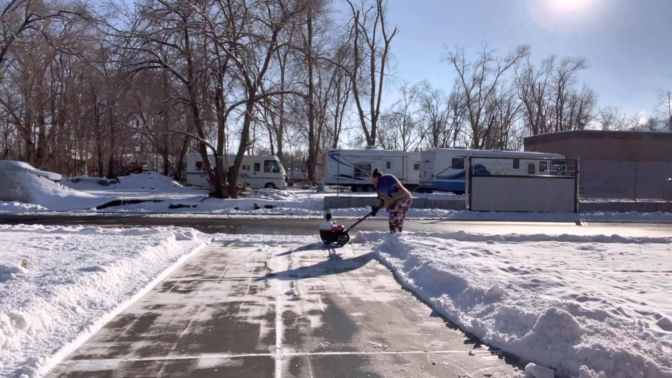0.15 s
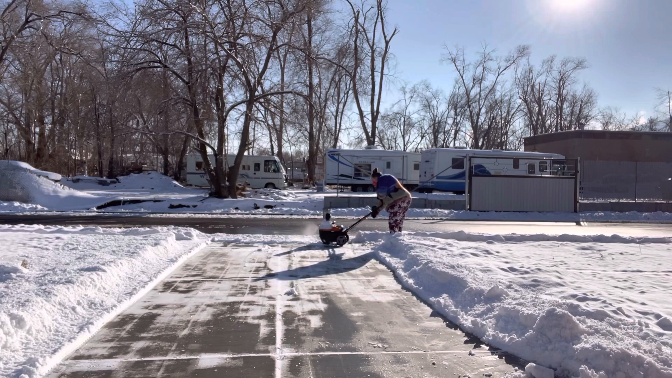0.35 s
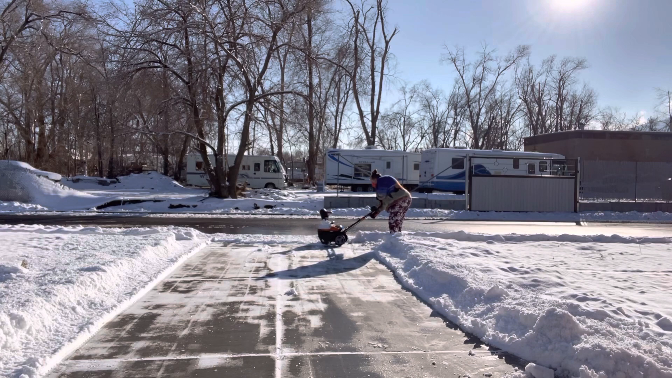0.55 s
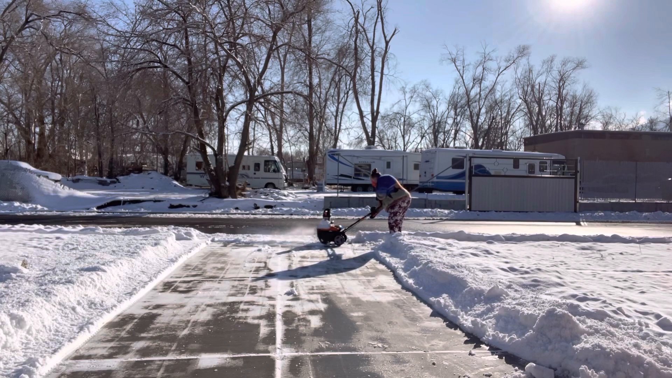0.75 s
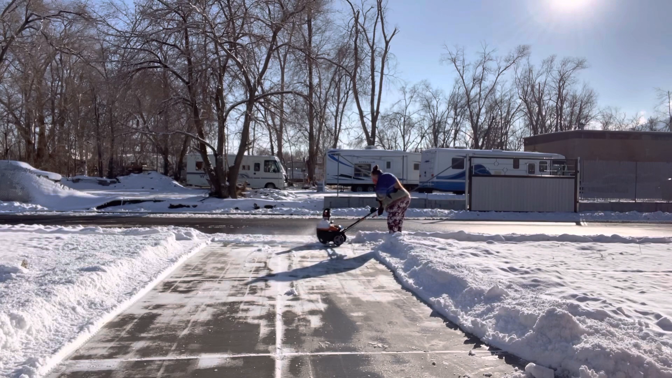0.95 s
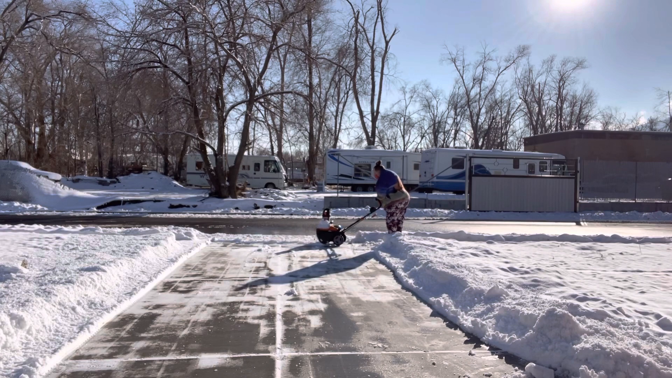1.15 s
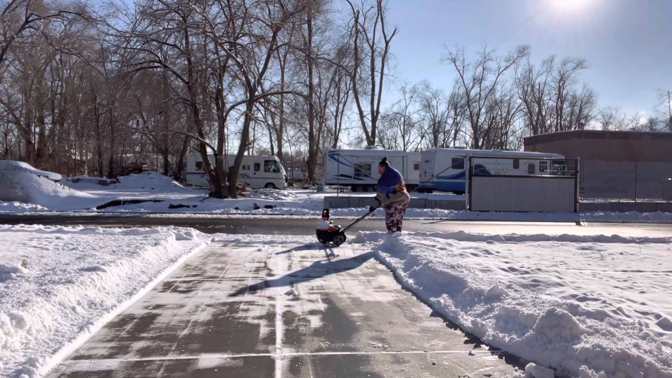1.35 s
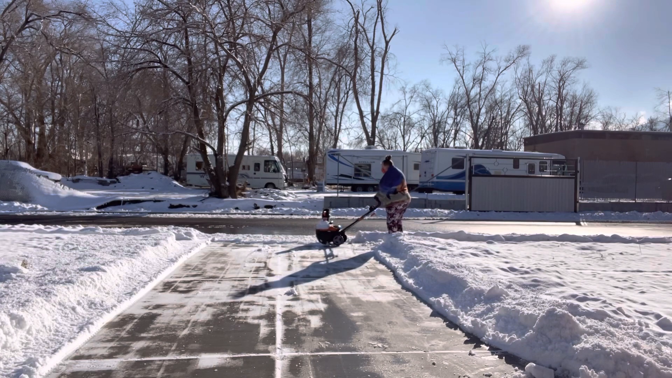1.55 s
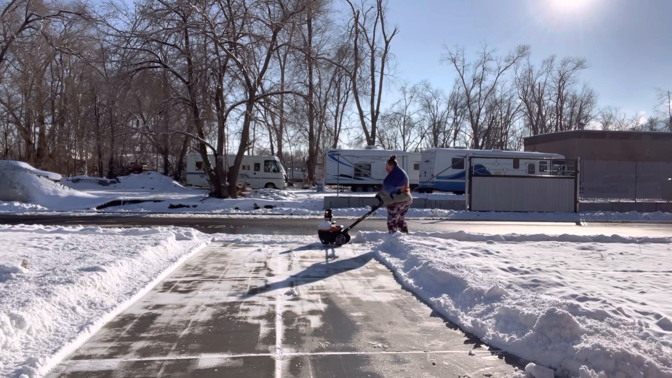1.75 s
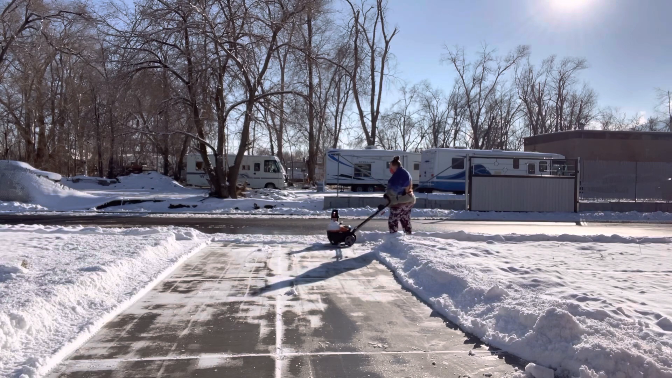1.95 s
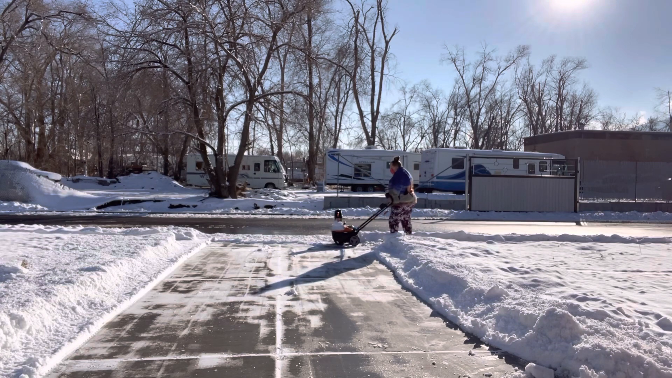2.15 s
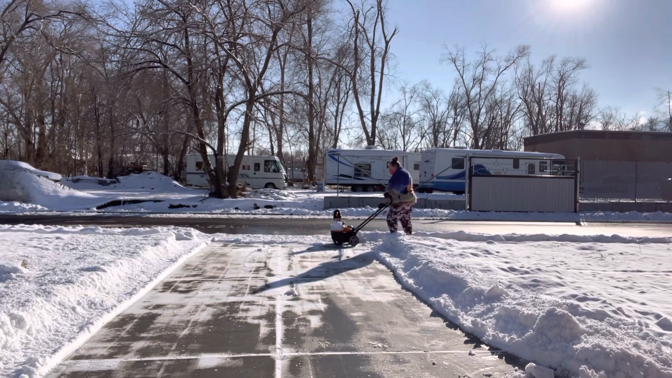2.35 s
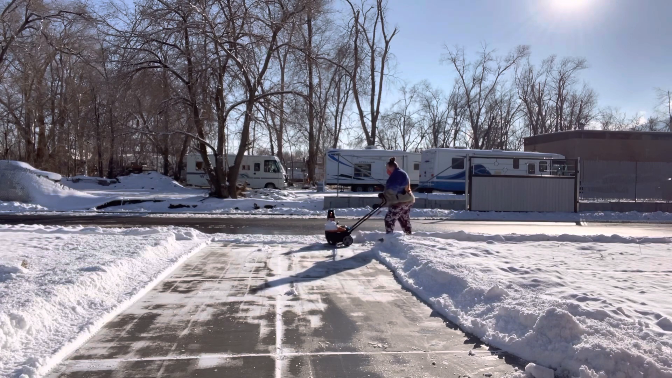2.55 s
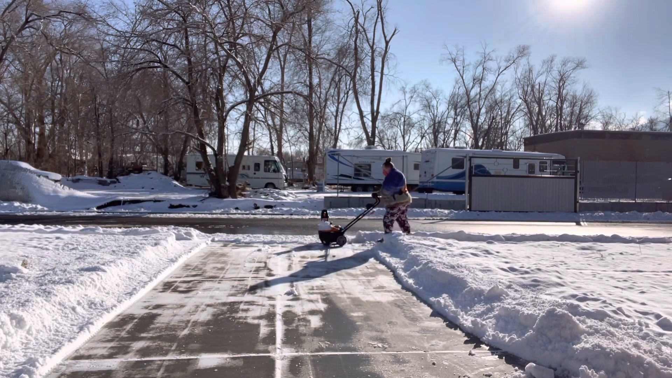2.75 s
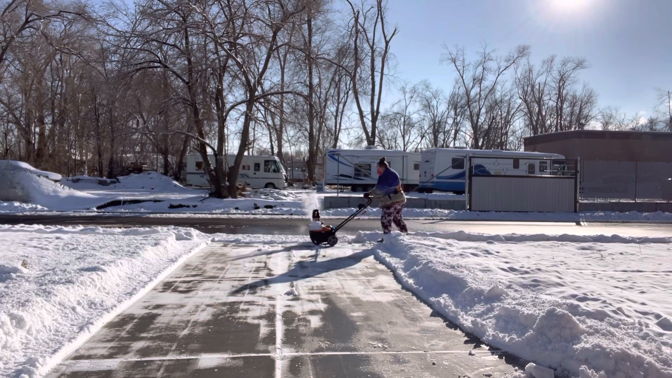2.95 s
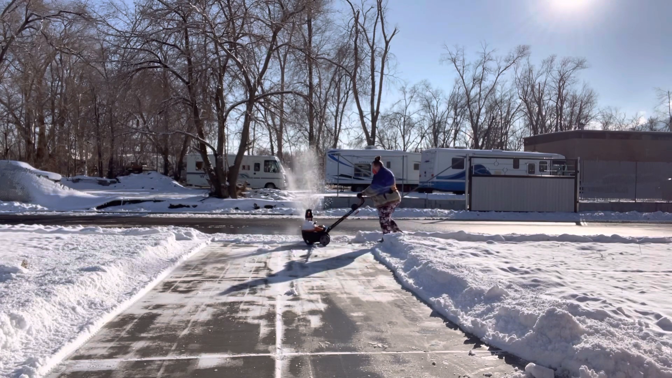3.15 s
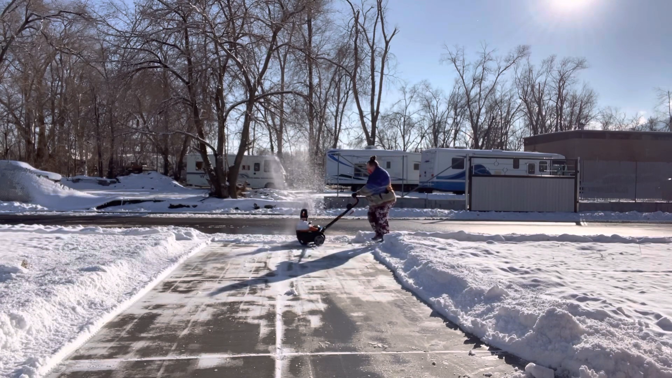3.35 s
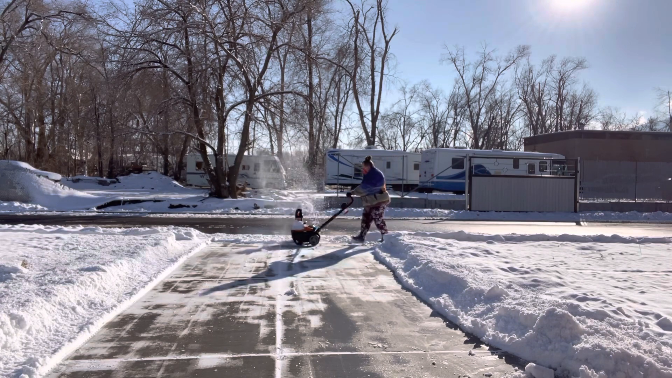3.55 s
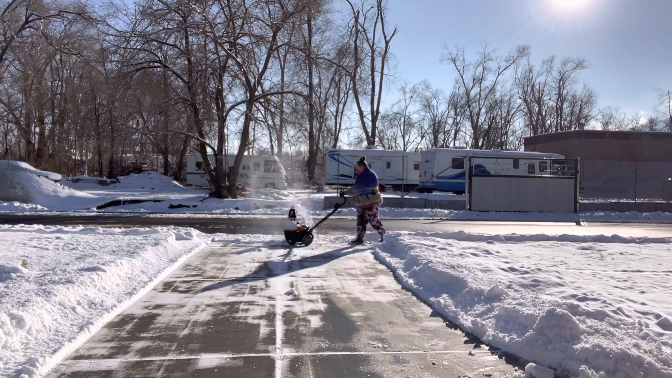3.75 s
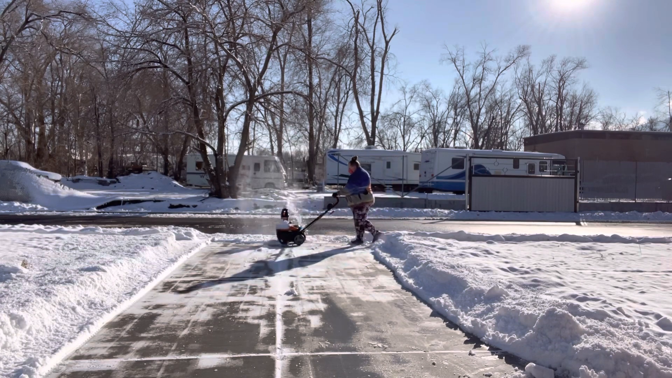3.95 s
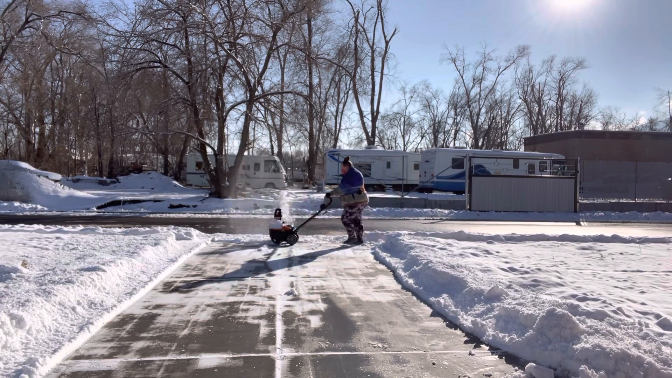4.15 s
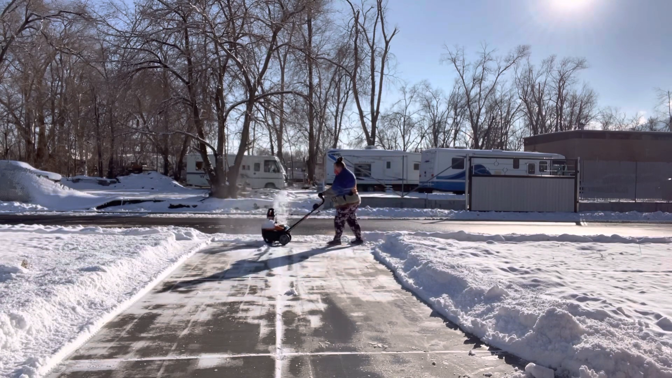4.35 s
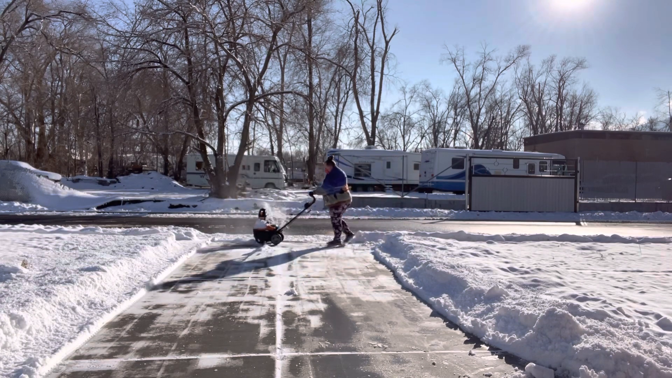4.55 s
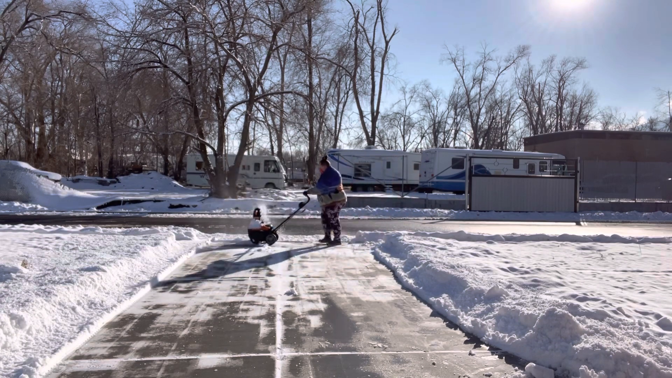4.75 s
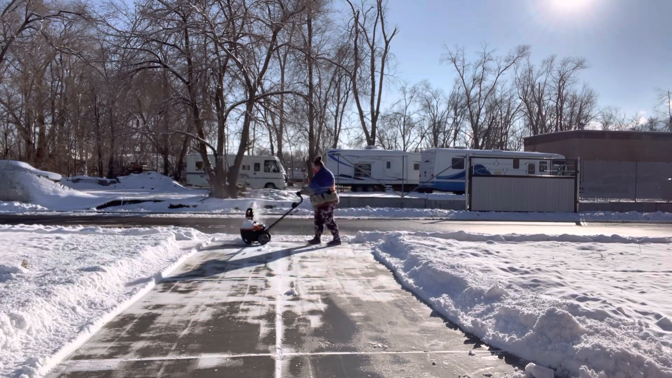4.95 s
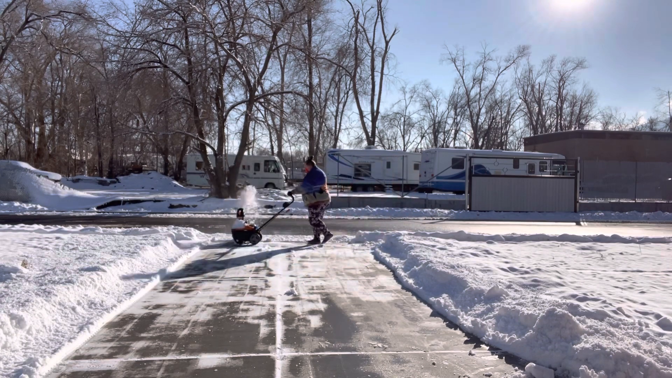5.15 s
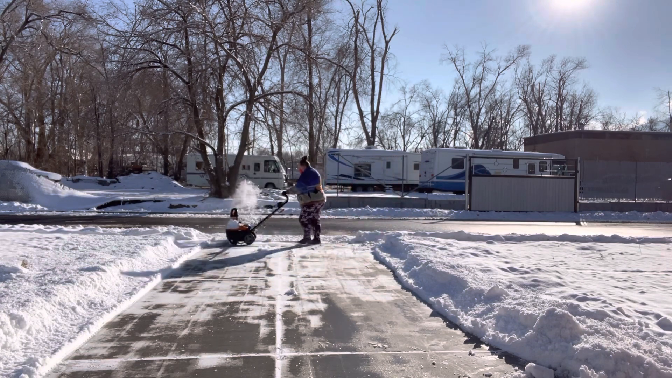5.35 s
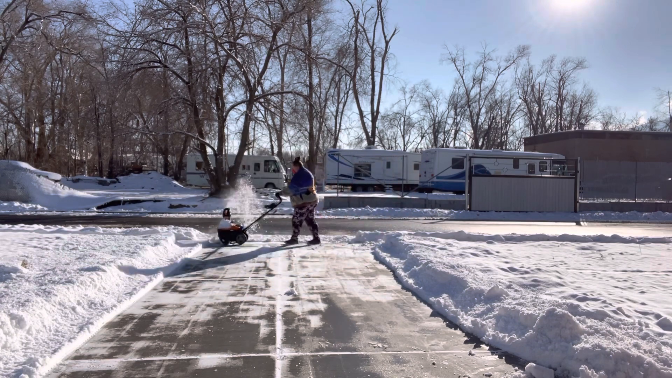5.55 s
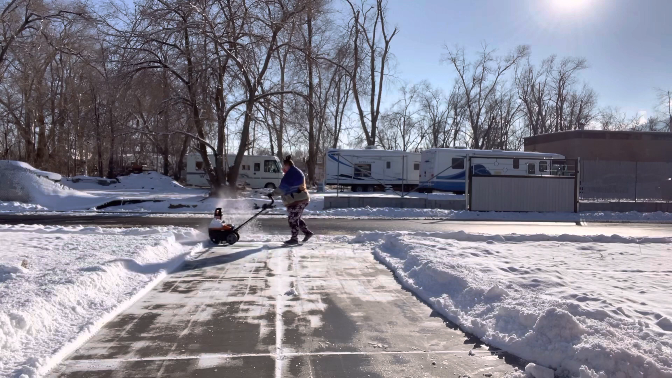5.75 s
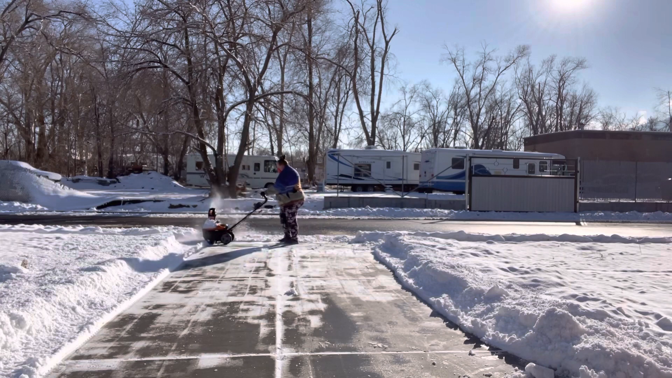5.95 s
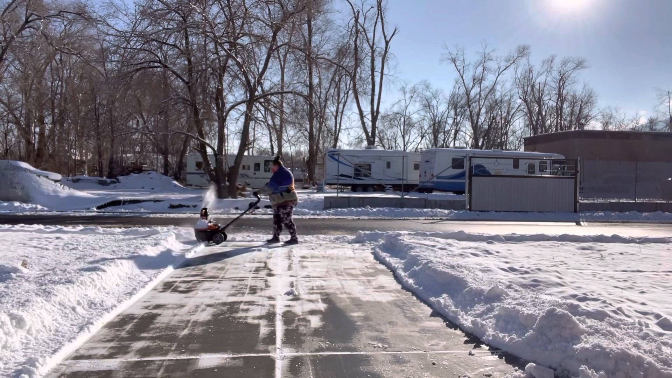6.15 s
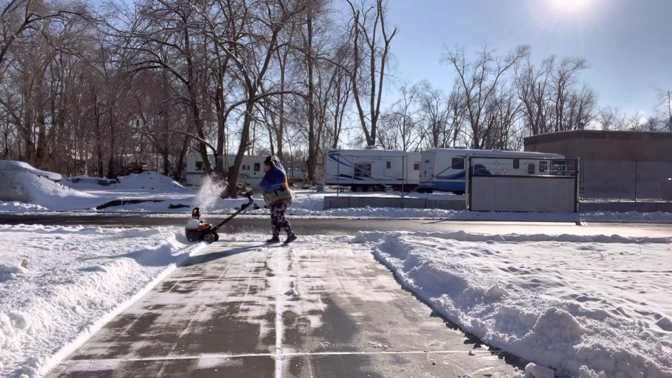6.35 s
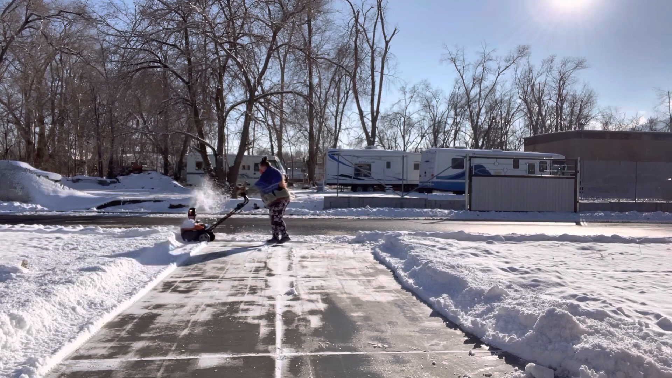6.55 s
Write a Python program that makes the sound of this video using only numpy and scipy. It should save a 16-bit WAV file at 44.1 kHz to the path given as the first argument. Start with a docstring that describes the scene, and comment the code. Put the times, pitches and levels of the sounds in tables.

```python
"""Cordless snowblower on a driveway

A snowblower is pushed across a driveway, some way off, drifting from right to left.
Its electric motor whines (sine tones) and drives a paddle auger by a belt. The housing scrapes the concrete
(filtered clicks) and the auger spins free, then bites into snow: the motor sags, every paddle slaps and
crunches (filtered pulses and grains), and lumps of ice knock in the plastic housing (short dying tones).
Around it are rushing air (filtered noise), echoes from the yard and a distant rumble."""
import sys
import numpy as np
from scipy import signal
from scipy.fft import rfft, irfft, next_fast_len
from scipy.io import wavfile
from scipy.ndimage import uniform_filter1d, map_coordinates

SR = 44100
rng = np.random.default_rng(int(sys.argv[2]) if len(sys.argv) > 2 else 0)


def to_wav(sig):
    """Store sig (one row per channel, or 1-D mono) as 16-bit WAV at the path in sys.argv[1].

    Samples outside -1..1 are clipped; the rate is SR.
    """
    pcm = np.clip(np.atleast_2d(sig), -1, 1) * 32767
    pcm = np.round(pcm).astype(np.int16)
    wavfile.write(sys.argv[1], SR, pcm.T)  # frames by channels


N = 291501
T = np.arange(N) / SR  # time of every sample, in seconds

# Colour of the distant rumble: (pitch [Hz], relative level [dB])
TOWN_COLOUR = [(15, -33), (35, -17), (65, 4.5), (100, -1), (170, 2.5), (400, -8.5), (2000, -27),
               (15000, -99)]
# Colour of the echoes in the yard: (pitch [Hz], relative level [dB])
YARD_COLOUR = [(50, -24), (200, -18), (380, -14), (700, -10.5), (1300, -7.5), (2500, -69), (6000, 6.5),
               (14000, -7)]

# Steady rush of the auger and the cooling air: (pitch [Hz], relative level [dB])
RUSH_COLOUR = [(100, -12), (180, 0), (500, 1.5), (650, -2), (800, 2), (1000, -4.5), (1200, -3.5),
               (1400, -7), (1800, -9), (2250, -11.5), (2600, -17), (3000, -20.5), (3900, -18.5),
               (4600, -20), (5200, -17), (6500, -19), (7400, -58), (8800, -31.5), (12000, -32.5),
               (14500, -36.5)]
# How loud the rush is: (time [s], body level [dB], treble level [dB])
RUSH_LEVEL = [(0, -31.5, -38), (.2, -35.5, -38.5), (.8, -36, -37.5), (1.3, -40.5, -39.5),
              (2.7, -37.5, -37.5), (3.2, -31, -39.5), (5.0, -36, -39.5), (5.6, -36.5, -35),
              (5.8, -38, -36.5), (6.2, -41, -38), (6.6, -45, -44)]
# Fine hiss from the motor vents: (pitch [Hz], relative level [dB])
VENT_COLOUR = [(6500, -40), (7800, -20), (8700, -6), (10800, -4), (12000, 0), (13000, -3), (14200, -20)]
# Air beaten by the paddles: (multiple of the paddle rate [count], relative level [dB])
PADDLE_AIR = [(1, -11.5), (2, -9), (3, 0.5), (4, 1), (5, -6.5), (6, -9), (7, -6.5), (8, -12), (9, -44),
              (10, -7.5), (11, -26), (12, -53)]
# How loud the beaten air is: (time [s], level [dB])
PADDLE_AIR_LEVEL = [(0, -36), (1.1, -43.5), (2.1, -36), (3.2, -35), (4.7, -31), (5.4, -35), (6.1, -54)]

# Colour of the scrape over concrete: (pitch [Hz], relative level [dB])
SCRAPE_COLOUR = [(60, -34), (110, -13), (150, 6), (210, -13), (320, 8), (430, 6.5), (830, 7), (1050, -3.5),
                 (1400, -9.5), (1850, -6.5), (2500, -25), (2950, -33), (3400, -24), (4300, -25),
                 (6500, -23), (8000, -105), (14000, -63)]
# Ringing of the scraper blade: (pitch [Hz], width [Hz], relative level [dB])
BLADE_MODES = [(830, 78, 3), (1750, 83, -9), (2720, 140, -19), (3300, 160, -9)]
# The housing dragged over concrete: (start [s], length [s], level [dB], swell [dB per s])
DRAGS = [(0.0, 0.084, -32, 50), (.255, 0.07, -36, 7), (.41, 0.19, -31, 31.5), (.605, 0.11, -28.5, -18),
         (.925, 0.021, -33, -2)]
DRAG_ATTACK_S, DRAG_RELEASE_S = .02, .025
# The paddles catch the pavement: (start [s], length [s], level [dB], swell [dB per s])
PAVEMENT_CATCHES = [(.622, 0.05, -22.5, -10)]

# Crusts of ice ground up: (start [s], length [s], level [dB], swell [dB per s])
CRUSTS = [(2.93, .08, -48, 40), (3.74, .1, -50, 0), (4.86, .11, -44, 20), (5.03, .12, -44.5, -20),
          (5.275, .06, -41.5, 0)]
CRUST_ATTACK_S, CRUST_RELEASE_S = .01, .025
# The bright snap of breaking ice: (pitch [Hz], relative level [dB])
SNAP_COLOUR = [(500, -29), (1800, 3), (3500, 0.5), (6000, -6.5), (7800, -25), (9500, -15), (12500, -13),
               (15000, -17)]
# Lumps of ice striking the housing: (time [s], ring level [dB], pitch of the spot struck [Hz],
# crack level [dB], top of the crack [Hz], dull thump level [dB])
ICE_KNOCKS = [(0.316, -38, 800, -44, 6000, -40), (0.329, -20, 800, -54, 2000, -42),
              (0.608, -14, 685, -39, 2500, -19), (0.62, -20, 700, -40, 3000, -22),
              (0.645, -25, 690, -40, 3000, -20), (0.676, -17.5, 800, -49, 5000, -32),
              (1.158, -43, 900, -33, 5000, -44), (1.364, -30, 895, -25, 9000, -47),
              (2.956, -26, 740, -37, 3000, -26), (2.972, -21, 600, -33, 3000, -28),
              (3, -21.5, 910, -43, 2500, -36), (3.18, -32, 800, -38, 4000, -35),
              (3.22, -29, 800, -23, 5000, -17), (3.358, -27, 820, -47, 2500, -14),
              (3.754, -23, 830, -28, 4000, -22), (3.771, -29, 800, -31, 5000, -30),
              (3.785, -28, 900, -26, 5000, -30), (3.833, -28, 800, -35, 5000, -32),
              (3.974, -37, 1020, -43, 3000, -13), (4.088, -18, 694, -43, 3000, -15.5),
              (4.585, -23, 755, -51, 3000, -19), (4.846, -32, 760, -33, 4000, -13),
              (4.861, -32, 800, -24, 3000, -8.5), (4.876, -7, 830, -20, 3000, -12),
              (4.894, -11, 680, -27, 2500, -7), (4.91, -16, 770, -25, 4000, -19),
              (4.927, -13.5, 634, -10, 3000, -9), (4.943, -13, 880, -19, 3500, -32),
              (4.962, -14.5, 1260, -25, 2500, -13), (4.977, -30, 760, -37, 3000, -11),
              (5.028, -30, 760, -25, 4000, -16), (5.042, -16.5, 1130, -20.5, 11000, -20),
              (5.073, -24, 640, -18, 6000, -15), (5.086, -23, 800, -22, 4000, -18),
              (5.105, -13.5, 710, -26, 3000, -24), (5.119, -30, 760, -45, 3000, -15),
              (5.135, -23, 660, -24, 12000, -23), (5.155, -22, 800, -25, 3500, -22),
              (5.286, -22, 760, -15, 5000, -16.5), (5.302, -17.5, 1130, -18, 5000, -30)]
# Panels of the plastic housing: (pitch [Hz], width [Hz], relative level [dB])
HOUSING_MODES = [(255, 110, -15), (470, 85, -4), (690, 68, 6), (800, 72, 5), (993, 90, 3), (1130, 51, -2),
                 (1660, 81, -1), (2170, 54, 5), (2400, 170, 10)]
SPOT_DB_PER_OCTAVE = 18.5  # a blow favours the panels near the pitch of its spot

# One paddle slap in the housing: (pitch [Hz], relative level [dB])
SLAP_COLOUR = [(40, -42), (68, -48), (128, 12.5), (200, -14), (268, 8.5), (335, 2.5), (400, -10),
               (470, -15.5), (540, -2.5), (610, -24), (760, -16), (950, -36), (1150, -43), (2000, -29)]
# Colour of snow being crushed: (pitch [Hz], relative level [dB])
CRUNCH_COLOUR = [(90, -29), (170, -2.5), (300, -0.5), (520, 6.5), (620, 0), (760, 9.5), (1000, -4.5),
                 (1170, 1), (1350, -10.5), (1650, -7.5), (2250, -14.5), (2900, -16), (3500, -17),
                 (6000, -35), (7800, -40), (11000, -61), (15000, -47)]
# The snow met by the paddles, from packed and icy to soft:
# (time [s], slap level [dB], crunch level [dB], thud level of clumps [dB])
SNOW_LEVELS = [(2.88, -7, -2, -17), (3.05, -4, 0.5, -32), (3.25, 2.5, -1, -12), (3.45, -1.5, -3.5, -11),
               (3.62, -0.5, -2, -35), (3.8, -3.5, -4, -8), (4.05, -3.5, -4, -36), (4.2, -2, -3, -21),
               (4.45, -4.5, -6.5, -21), (4.62, -6.5, -4.5, -21), (4.8, -11, -5.5, -4), (4.9, -4.5, 0, -22),
               (5.12, -3.5, -3, -11), (5.4, -16.5, -6, -18), (5.7, -9, -3.5, -10), (5.92, -5, -4.5, -15),
               (6.07, -3, -7.5, -10), (6.2, -6.5, -11.5, -7.5), (6.38, -3, -11.5, -10.5),
               (6.6, -7.5, -16.5, -18)]
# Hollow note of the chute, which shifts as snow fills and leaves it: (time [s], pitch [Hz], level [dB])
CHUTE_NOTE = [(2.85, 480, -65), (2.98, 458, -25.5), (3.08, 470, -37), (3.25, 470, -33), (3.42, 415, -33),
              (3.62, 520, -35.5), (3.8, 436, -36.5), (4.05, 487, -37), (4.3, 420, -34), (4.55, 415, -29.5),
              (4.7, 434, -60.5), (5.15, 460, -40), (5.6, 437, -58), (6.1, 432, -36.5), (6.6, 425, -47.5)]
# Load is the share of free speed lost: where the paddles start to bite, and in a full swath
RUBBING, FULL_LOAD = 0.048, 0.13
# Levels at full load, before the snow's own levels are added; amplitude grows as effort ** law
SLAP_DB, SLAP_LAW, CRUNCH_DB, CRUNCH_LAW = -25.5, 0.48, -28.5, 0.38
SURGE_DB = 2.5  # clumps arrive in surges
HEAVE_HZ, HEAVE_S = 290, .0016  # rounded push of a clump: pitch, and spread of its bell-shaped outline
THUMP_DELAY_S, THUD_DELAY_S = .004, .0013  # the push follows a lump's crack, or a paddle's edge

# Motor speed, heard as the pitch of its whine: (time [s], whine pitch [Hz])
WHINE_PITCH = [(0.0, 6780), (0.29, 6741), (0.59, 6767), (0.64, 6602), (0.86, 6756), (1.25, 6777),
               (2.8, 6779), (2.87, 6657), (2.96, 6026), (3.0, 6005), (3.13, 6268), (3.24, 5991),
               (3.42, 6150), (3.68, 6147), (3.96, 5578), (4.2, 6199), (4.47, 6129), (4.62, 6296),
               (4.84, 6012), (4.93, 5484), (4.99, 5559), (5.03, 5888), (5.13, 5751), (5.28, 6169),
               (5.32, 6099), (5.52, 6417), (5.71, 6385), (5.89, 6553), (5.96, 6527), (6.09, 6019),
               (6.31, 6004), (6.42, 5633), (6.61, 5773)]
FREE_HZ = 233.8  # shaft turns per second with no load
BELT_RATIO, BELT_SLIP = 12 / 37, .11  # paddle passes per shaft turn; share lost per unit of sag
INERTIA_S = 0.06  # the speed lags the load by this long
WHINE_ORDER, RING_ORDER, UPPER_ORDER = 29, 16, 20  # cycles per shaft turn: whine, lower and upper note
# Low motor hum: (multiple of the shaft rate [count], level running free [dB], change [dB per unit of sag])
MOTOR_HUM = [(1, -44, 17), (3, -49.5, -45), (4, -46.5, -130), (5, -54.5, 15), (8, -62, -10)]
# Resonance of the motor's lower note: (pitch [Hz], level [dB])
LOWER_NOTE = [(3100, -75), (3320, -66), (3385, -51), (3480, -48), (3600, -48), (3680, -70), (3750, -63)]
# Extra level of the lower note: (time [s], level [dB])
LOWER_NOTE_LEVEL = [(0, -9), (1.4, -2.5), (1.7, 7), (2.05, -6), (2.9, -5), (3.15, -4), (3.3, -2), (3.44, 4),
                    (3.56, -1), (3.67, 2), (4.25, -4), (4.45, -13), (4.6, -3), (4.71, 3), (4.85, -4),
                    (5.35, -12), (5.46, -2.5), (5.6, -13), (5.73, -2), (5.95, -1), (6.05, -3)]
# Resonance of a fainter, higher motor note: (pitch [Hz], level [dB])
UPPER_NOTE = [(3800, -67), (4020, -57.5), (4130, -68), (4300, -66), (4500, -78)]
# The whine swells as it slides into a resonance of the motor casing: (pitch [Hz], level [dB])
CASING_RESONANCE = [(5500, -57), (5750, -44), (6000, -42.5), (6180, -36), (6500, -38.5), (6650, -45.5),
                    (6790, -47.5)]
# The machine turns as it is pushed: (time [s], whine level [dB], left above right [dB])
AIM = [(0, -4.5, -1), (.65, 0.5, 2.5), (1.35, -4, 7), (2.0, -0.5, 3), (2.75, -4.5, 3.5), (3.25, -8, -2),
       (3.65, -3.5, 1), (4.05, -8.5, -3), (4.3, -5.5, -6.5), (4.75, -5, -7.5), (5.0, -4, 2), (5.35, 1, -3),
       (5.67, -10, -6.5), (5.85, 1, 4), (6.2, -4, 3), (6.6, -5, 4)]
OCTAVE_DB, OCTAVE_SAG_DB = -49, -59  # octave of the whine: running free, and dB per unit of sag
OCTAVE_LEAD = 0.094  # turns by which the octave reaches the left microphone sooner

# Crossing from right to left changes which microphone hears it first: (time [s], left lag [samples])
LEFT_LAG = [(0, 1.5), (2.5, 1.9), (3.2, 0.57), (4.2, 0.5), (4.9, -1.77), (6.6, -3)]
# The microphones' top end: (pitch [Hz], level [dB])
MIC_TOP = [(13600, 0), (14300, -3), (15500, -14)]
EDGE_HZ = 15600  # nothing much is heard above this


def amp(db):
    """Turns decibels into gain."""
    return 10 ** (np.asarray(db) / 20)


def unit(x):
    """Scales a sound to an average (rms) strength of 1."""
    return x / np.sqrt(np.mean(x ** 2) + 1e-20)


def curves(rows):
    """Joins the rows of a time table by straight lines, one curve per column."""
    s, *columns = np.transpose(rows)
    return [np.interp(T, s, column) for column in columns]


def at_pitch(points, hz):
    """Reads the level in dB of a resonance curve at a moving pitch."""
    return np.interp(hz, *np.transpose(sorted(points)))


def colour(x, points):
    """Filters a sound to a spectrum of (Hz, dB) points, with no sound ahead of its cause."""
    f, db = np.transpose(points)
    hz = abs(np.fft.fftfreq(4096, 1 / SR))
    log_gain = np.log(amp(np.interp(np.log(hz + 1), np.log(f + 1), db)))
    # this phase packs the filter's energy as early as possible
    taps = np.fft.ifft(np.exp(np.conj(signal.hilbert(log_gain)))).real
    return signal.oaconvolve(x, taps[:len(taps) // 2])[:N]


def drift(rate_hz):
    """Smooth random wander of rms 1, quicker for a higher rate."""
    size = next_fast_len(N, True)
    hz = np.fft.rfftfreq(size, 1 / SR)
    spectrum = rfft(rng.standard_normal(size)) / (1 + (hz / rate_hz) ** 2)
    return unit(irfft(spectrum, size)[:N])


def tone(turns):
    """A sine of rms 1 that starts at a random point of its cycle."""
    return np.sqrt(2) * np.sin(2 * np.pi * (turns + rng.random()))


def grains(per_s, spread_db):
    """Random clicks of uneven size, about per_s of them each second."""
    size = amp(spread_db * np.minimum(rng.exponential(1, N), 4))
    lands = rng.random(N) < per_s / SR
    return unit(size * rng.standard_normal(N) * lands)


def ring(modes):
    """One dying tone for each mode (Hz, width, dB); a wider mode dies sooner."""
    t = np.arange(SR // 20) / SR
    return np.array([amp(db) * np.exp(-np.pi * width * t) * np.cos(2 * np.pi * hz * t)
                     for hz, width, db in modes])


def rattle(modes, gate, per_s, spread_db):
    """Coarse grains land here and there, each ringing one mode."""
    pings = sum(signal.oaconvolve(gate * grains(per_s, spread_db), mode)[:N] for mode in ring(modes))
    return unit(colour(pings, [(60, -20), (300, 0), (3400, 0), (5000, -14), (8000, -35)]))


def spells(rows, attack_s, release_s):
    """Gain of short spells: a quick rise, a hold that swells or sinks, a dying tail."""
    gain = 0
    for s, length, db, swell in rows:
        rise = np.clip((T - s) / attack_s + .5, 0, 1)
        hold = amp(db + swell * np.clip(T - s, 0, length))
        gain = gain + rise * hold * np.exp(-np.maximum(T - s - length, 0) / release_s)
    return gain


def heave(pushes, delay_s):
    """Each push shoves the air in the housing: one rounded swing down and up."""
    t = np.arange(-(SR // 50), SR // 50 + 1) / SR - delay_s
    swing = np.sin(2 * np.pi * HEAVE_HZ * t) * np.exp(-.5 * (t / HEAVE_S) ** 2)
    return signal.oaconvolve(pushes, swing, "same")


def town(rumble_db=-46, drone_db=-48, drone_hz=100):
    """Distant rumble of filtered noise, with a wavering low drone."""
    rumble = unit(colour(rng.standard_normal(N), TOWN_COLOUR))
    drone = tone(drone_hz * T + 0.23 * drift(1.5))
    return amp(rumble_db) * rumble + amp(drone_db + 2 * drift(0.8)) * drone


def yard(x, t60=0.18):
    """Scattered reflections from the house and snow banks, falling by 60 dB in t60 seconds."""
    t = np.arange(SR // 3) / SR
    lands = rng.random(len(t)) < 2000 / SR
    taps = rng.standard_normal(len(t)) * lands * amp(-60 * t / t60) * (t > .003)
    return colour(signal.oaconvolve(x, taps / np.linalg.norm(taps))[:N], YARD_COLOUR)


def rush(passes, throb=0.12, hiss_db=-66, split_hz=1000):
    """Air churned in the housing, throbbing with the paddles, and the hiss of the motor vents."""
    throbbing = 1 + throb * np.cos(2 * np.pi * passes)
    air = unit(colour(rng.standard_normal(N) * throbbing * amp(1.16 * drift(35)), RUSH_COLOUR))
    body = signal.sosfiltfilt(signal.butter(2, split_hz, fs=SR, output="sos"), air)
    treble = air - body
    body_db, treble_db = curves(RUSH_LEVEL)
    hiss = amp(hiss_db) * unit(colour(rng.standard_normal(N), VENT_COLOUR))
    return amp(body_db) * body + amp(treble_db) * treble + hiss


def paddle_air(passes):
    """The hum of the paddles beating air, at multiples of their passing rate."""
    hum = sum(amp(db + 2.2 * drift(6)) * tone(round(k) * passes + 0.06 * drift(2)) for k, db in PADDLE_AIR)
    return amp(curves(PADDLE_AIR_LEVEL)[0]) * unit(hum)


def scrape(chatter_db=-0.2, blade_db=-6, crackle_db=-13):
    """The scraper edge chatters over rough concrete; coarse grit crackles under it and rings its blade."""
    grit = unit(colour(grains(4000, 0.48) * amp(chatter_db * drift(120)), SCRAPE_COLOUR))
    blade = rattle(BLADE_MODES, 1, per_s=600, spread_db=-2.0)
    crackle_colour = [(400, -24), (1100, 0), (2000, 0), (3600, -7), (5000, -20), (8000, -40)]
    crackle = unit(colour(grains(1400, .5), crackle_colour))
    mix = unit(grit + amp(blade_db) * blade + amp(crackle_db) * crackle)
    return spells(DRAGS, DRAG_ATTACK_S, DRAG_RELEASE_S) * mix


def crusts():
    """Icy crust crackles in fine, uneven grains."""
    crackle = unit(colour(grains(9000, 0.53), SNAP_COLOUR))
    return spells(CRUSTS, CRUST_ATTACK_S, CRUST_RELEASE_S) * crackle


def knocks(shatter_s=0.0039, tumble_s=0.00041, uneven_db=5.5):
    """Each lump cracks on a paddle, rebounds and thumps into the chute; the panels near the spot ring briefly."""
    t = np.arange(SR // 20) / SR
    body, crack, push = np.zeros((3, N + len(t)))
    panels, panel_hz = ring(HOUSING_MODES), np.transpose(HOUSING_MODES)[0]
    for s, ring_db, spot_hz, crack_db, top_hz, thump_db in ICE_KNOCKS:
        shards = rng.standard_normal(len(t))
        # a first blow and a weaker rebound
        rebound_at = round(rng.uniform(.0035, .006) * SR)
        blows = (t == 0) + .6 * (np.arange(len(t)) == rebound_at)
        striking = blows + 0.073 * shards * np.exp(-t / tumble_s)
        # how much each panel rings, with a random sign
        octaves_away = abs(np.log2(panel_hz / spot_hz))
        share = amp(uneven_db * rng.standard_normal(len(panels)) - SPOT_DB_PER_OCTAVE * octaves_away)
        share *= rng.choice([-1, 1], len(panels)) / np.linalg.norm(share * panels[:, 0])
        at = slice(round(s * SR), round(s * SR) + len(t))
        body[at] += amp(ring_db) * signal.fftconvolve(striking, share @ panels)[:len(t)]
        dulling = signal.butter(1, min(top_hz, SR / 3), fs=SR)
        crack[at] += amp(crack_db) * signal.lfilter(*dulling, shards * np.exp(-t / shatter_s))
        push[at.start] += amp(thump_db)
    clack = colour(body[:N], [(60, -13), (200, 0), (2400, 0), (4000, -8), (8000, -32)])
    return clack + colour(crack[:N], SNAP_COLOUR) + heave(push[:N], THUMP_DELAY_S)


def rebound(x, share=.45, flight_s=.006, spread_s=.0011):
    """Thrown snow lands on the chute wall after a changing flight, so the growl's harmonics swell and break up."""
    late = np.arange(N) - SR * (flight_s + spread_s * drift(3.5))
    return unit(x + share * np.interp(late, np.arange(N), x))


def resonate(x, hz, width_hz):
    """A resonance that follows a moving pitch, with steep skirts."""
    turn, r = np.exp(2j * np.pi * np.cumsum(hz) / SR), np.exp(-np.pi * width_hz / SR)
    # shift the moving pitch down to zero, smooth, then shift it back up
    smooth = signal.lfilter([(1 - r) ** 2], [1, -2 * r, r * r], x / turn + 1e-18)
    return (turn * smooth).real


def chute(strokes, width_hz=150):
    """Each load flung up the chute sounds its hollow note, which wavers with the snow inside."""
    pitch_hz, level_db = curves(CHUTE_NOTE)
    wavering_hz = pitch_hz * (1 + .06 * drift(7))
    return amp(level_db) * rebound(resonate(strokes, wavering_hz, width_hz))


def snow(passes, sag, uneven_db=3.5, stagger=.012, wander=0.024, rattle_db=-10):
    """Each paddle slaps, heaves and crushes a load of snow, louder the harder the motor works."""
    # undo the inertia to find the load from the sagging speed
    load = uniform_filter1d(sag + INERTIA_S * SR * np.gradient(sag), size=2000)
    effort = np.maximum((load - RUBBING) / (FULL_LOAD - RUBBING), 1e-6)
    slap_db, crunch_db, thud_db = curves(SNOW_LEVELS)
    slap_gain = amp(SLAP_DB + slap_db) * effort ** SLAP_LAW
    slap_gain = slap_gain + spells(PAVEMENT_CATCHES, DRAG_ATTACK_S, DRAG_RELEASE_S)
    crunch_gain = amp(CRUNCH_DB + crunch_db) * effort ** CRUNCH_LAW

    # coarse snow makes the strokes uneven in time and size; soft snow leaves a regular buzz
    coarse = np.clip(1.3 * crunch_gain / slap_gain, .3, 1.1)
    bite = np.maximum.accumulate(passes + coarse * (stagger * drift(31) + wander * drift(3.76)))
    # one hit whenever the count of passes reaches a whole number
    hits = np.diff(np.floor(bite), prepend=np.floor(bite[0]))
    strokes = hits * amp(uneven_db * coarse * np.tanh(drift(80)))

    slaps = -rebound(colour(strokes, SLAP_COLOUR + [(6000, -85)]))
    thud_gain = amp(SLAP_DB + thud_db + SURGE_DB * np.tanh(drift(8.8))) * effort ** SLAP_LAW
    thuds = thud_gain * unit(heave(strokes, THUD_DELAY_S))
    hollow = effort ** SLAP_LAW * chute(strokes)
    # the grains are densest in strength just after each hit
    gate = .35 + np.exp(-(bite % 1) / .3)
    crunch = unit(colour(gate * amp(0.7 * drift(28)) * grains(7000, 0.4), CRUNCH_COLOUR))
    chips = rattle(HOUSING_MODES[2:6], gate, per_s=160, spread_db=1)
    return slap_gain * slaps + thuds + hollow + crunch_gain * (crunch + amp(rattle_db) * chips)


def motor(turns, shaft_hz, sag, fading_db=2.5):
    """Low hum at shaft multiples, and two notes that come and go as the speed carries them through resonances."""
    hum = sum(amp(db + sag_db * sag + 2 * drift(2.5)) * tone(round(k) * turns + 0.015 * drift(10))
              for k, db, sag_db in MOTOR_HUM)
    flutter = amp(2 * drift(15))
    shudder = 0.076 * drift(40)  # in cycles
    lower_db = at_pitch(LOWER_NOTE, RING_ORDER * shaft_hz) + curves(LOWER_NOTE_LEVEL)[0]
    lower_db = lower_db + fading_db * np.tanh(drift(6.5))
    lower = amp(lower_db) * tone(RING_ORDER * turns + shudder)
    upper_db = at_pitch(UPPER_NOTE, UPPER_ORDER * shaft_hz)
    upper = amp(upper_db) * tone(UPPER_ORDER * turns + shudder)
    return hum + flutter * (lower + upper)


def whine(turns, shaft_hz, sag, free_jitter=.012, load_jitter=0.14, flutter_db=1.2, fading_db=.8):
    """A high line and its octave; the shaft shudders ever more as it is dragged down, which blurs them."""
    aim_db, pan_db = curves(AIM)
    jitter = free_jitter + load_jitter * (sag / sag.max()) ** 2
    cycle = WHINE_ORDER * turns + jitter * drift(51) + 0.13 * drift(11.0)
    level_db = at_pitch(CASING_RESONANCE, WHINE_ORDER * shaft_hz) + aim_db + fading_db * drift(13.0)
    line = amp(level_db + flutter_db * drift(73)) * tone(cycle)
    octave_db = OCTAVE_DB + OCTAVE_SAG_DB * sag + 2.85 * drift(21)
    octave = amp(octave_db) * tone(2 * cycle + np.array([[OCTAVE_LEAD], [0]]))
    return line * amp(np.array([pan_db, -pan_db]) / 2) + octave


def scene():
    """One shaft speed drives the motor and paddles; the belt slips as the load drags the motor down."""
    shaft_hz = curves(WHINE_PITCH)[0] / WHINE_ORDER
    sag = 1 - shaft_hz / FREE_HZ
    turns = np.cumsum(shaft_hz) / SR
    passes = np.cumsum(shaft_hz * BELT_RATIO * (1 - BELT_SLIP * sag)) / SR
    distant = town()
    air = rush(passes) + paddle_air(passes)
    ground_and_ice = scrape() + crusts() + knocks()
    machine = air + ground_and_ice + snow(passes, sag) + motor(turns, shaft_hz, sag)
    # all but the whine reaches the left a little louder than the right
    direct = machine * amp([[.6], [-.6]])
    direct = direct + whine(turns, shaft_hz, sag)

    # above 7600 Hz the sound has no lag between the sides
    top = irfft(rfft(direct) * (np.fft.rfftfreq(N, 1 / SR) > 7600), N)
    lag = curves(LEFT_LAG)[0]
    lagged = [map_coordinates(x, [np.arange(N) + side * lag / 2], order=5, mode="nearest")
              for x, side in zip(direct - top, (-1, 1))]
    pair = top + np.array(lagged)
    echo = yard(machine + distant)
    return pair + distant * amp([[.8], [-.8]]) + np.array([echo, -echo])


def record(dry):
    """The stereo image narrows and the microphones fade in the treble; then a steep cut ends the band."""
    hz = np.fft.rfftfreq(N, 1 / SR)
    left, right = rfft(dry) * amp(np.interp(hz, *np.transpose(MIC_TOP)))
    mid = (left + right) / 2
    side = (left - right) / 2 * amp(np.interp(hz, [7500, 11000], [0, -3]))
    edge = signal.firwin(511, EDGE_HZ, window=("kaiser", 9), fs=SR)
    return signal.oaconvolve(irfft(np.array([mid + side, mid - side]), N), edge[None], "same")


dry = scene()
out = record(dry)
to_wav(out)
```